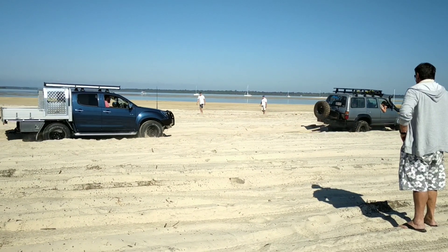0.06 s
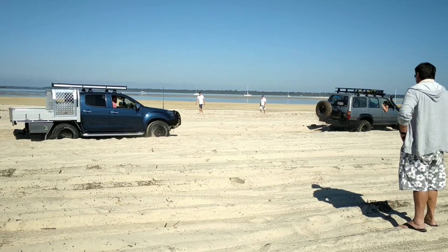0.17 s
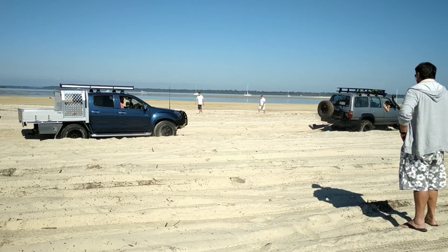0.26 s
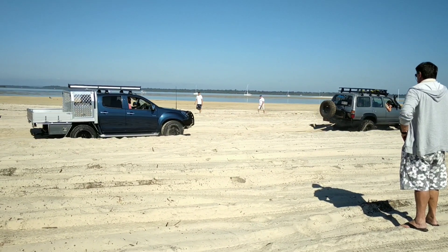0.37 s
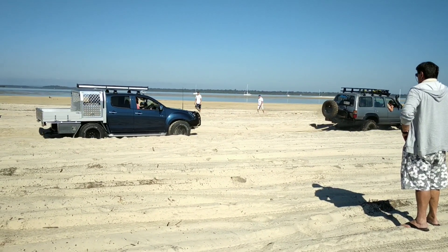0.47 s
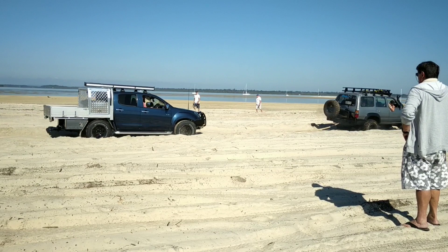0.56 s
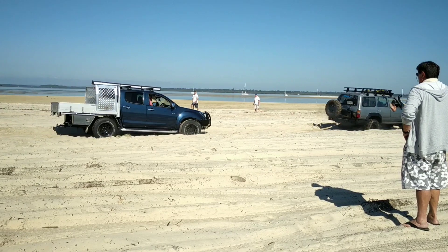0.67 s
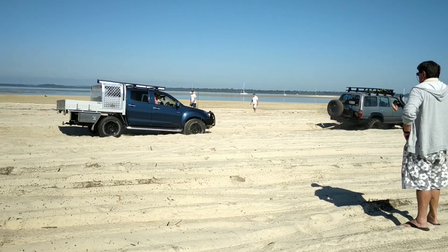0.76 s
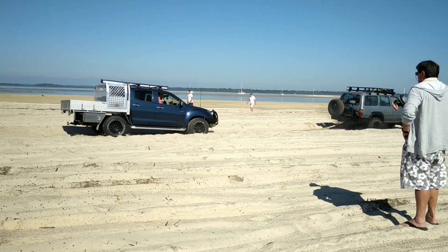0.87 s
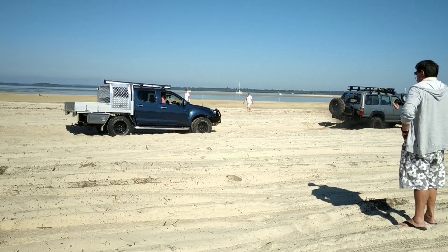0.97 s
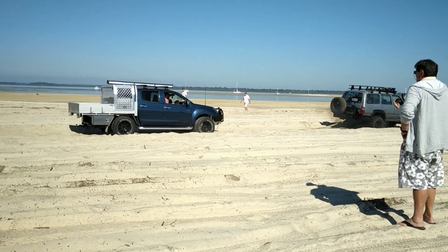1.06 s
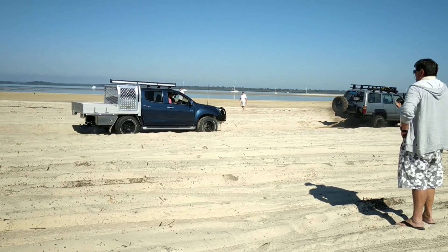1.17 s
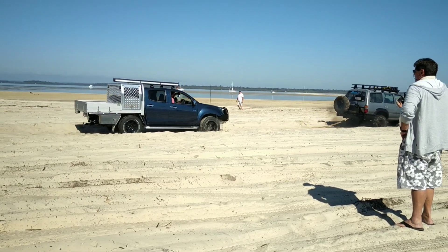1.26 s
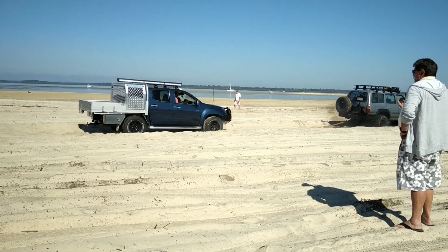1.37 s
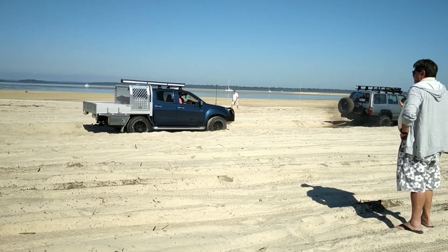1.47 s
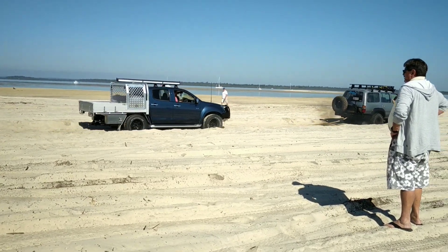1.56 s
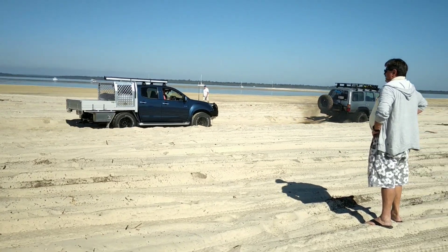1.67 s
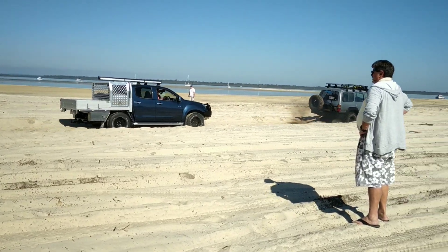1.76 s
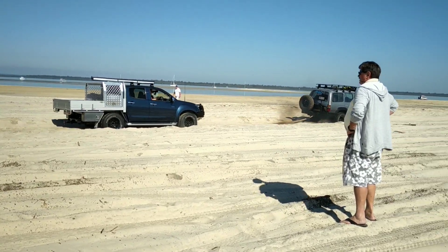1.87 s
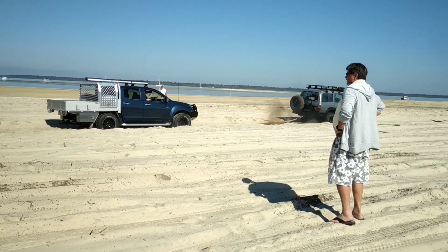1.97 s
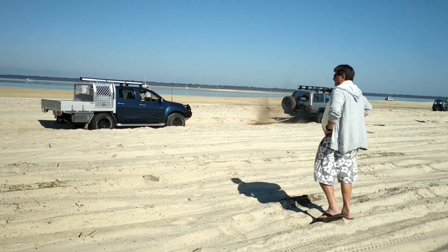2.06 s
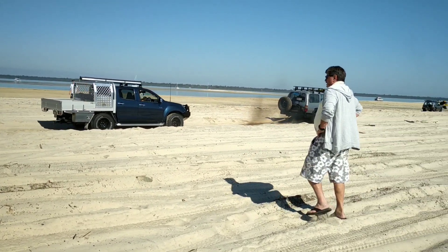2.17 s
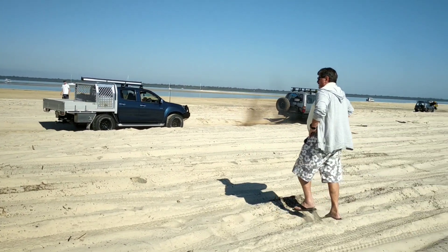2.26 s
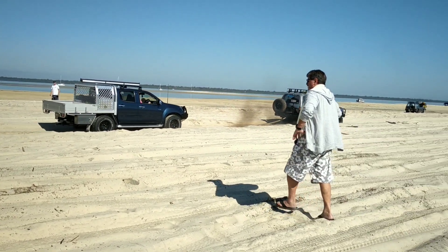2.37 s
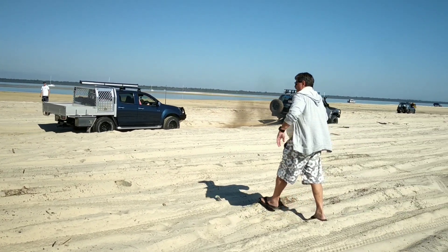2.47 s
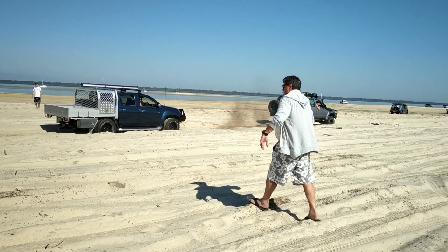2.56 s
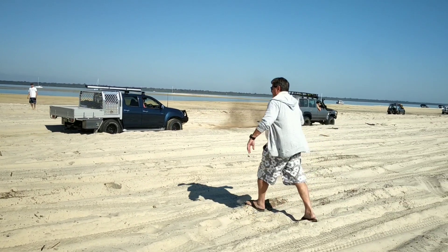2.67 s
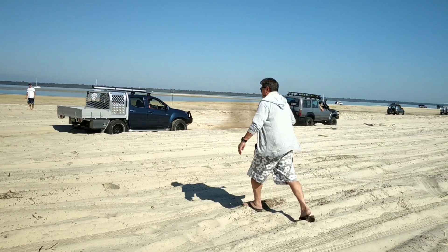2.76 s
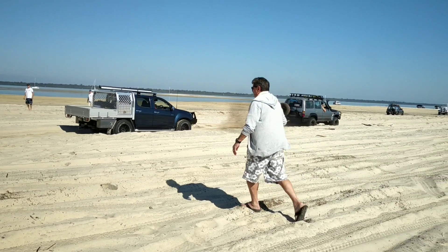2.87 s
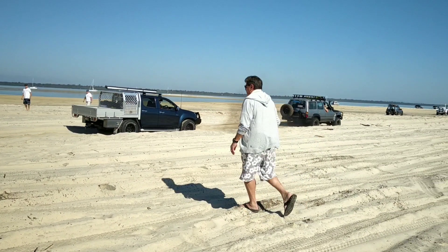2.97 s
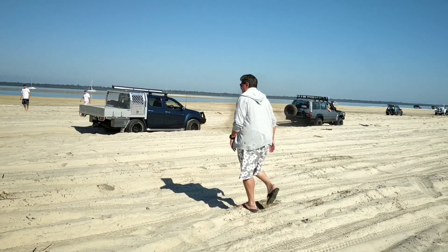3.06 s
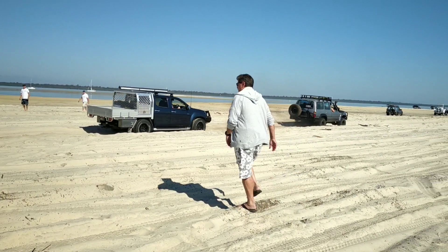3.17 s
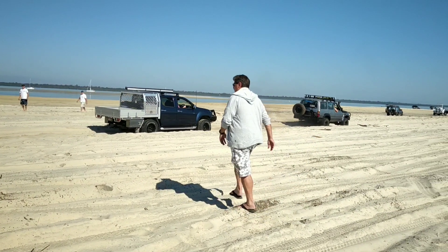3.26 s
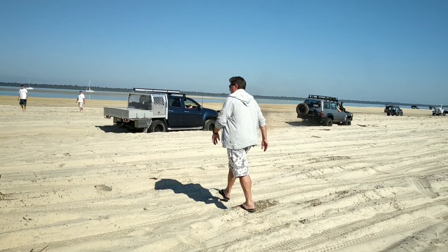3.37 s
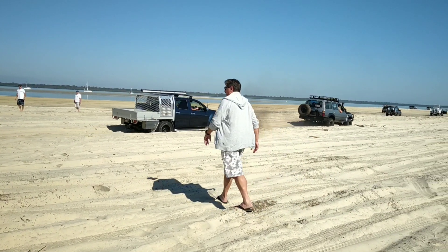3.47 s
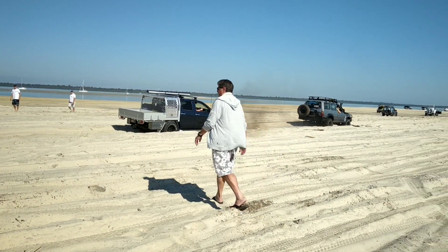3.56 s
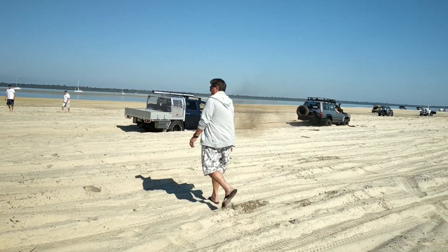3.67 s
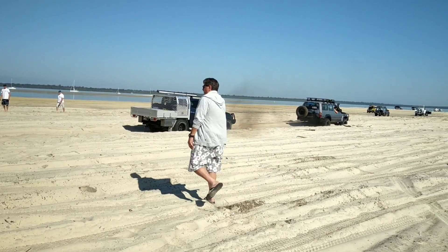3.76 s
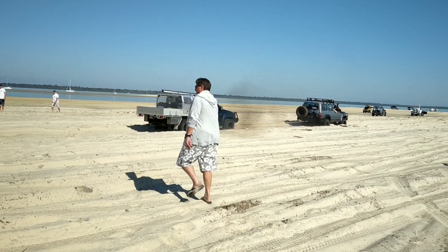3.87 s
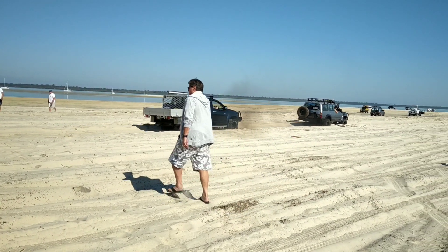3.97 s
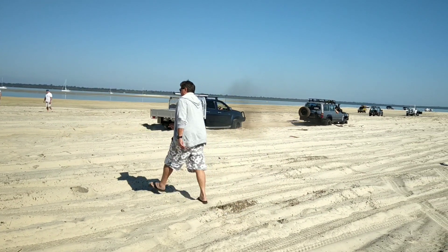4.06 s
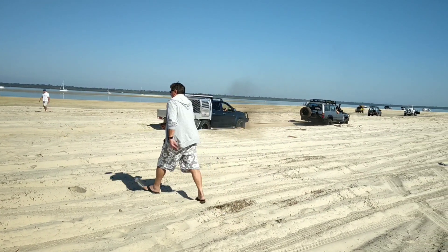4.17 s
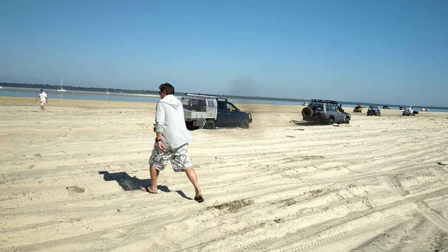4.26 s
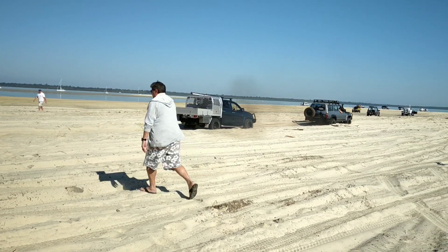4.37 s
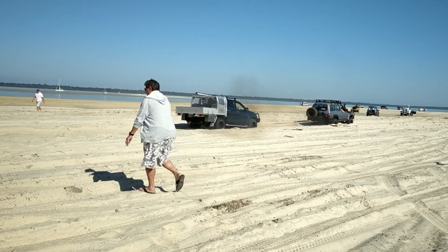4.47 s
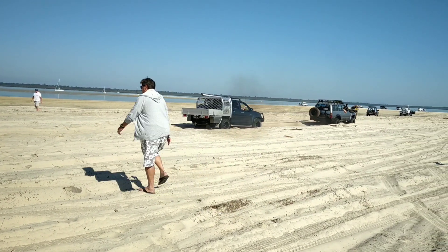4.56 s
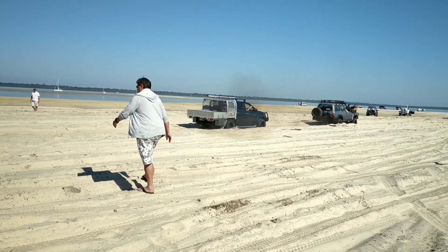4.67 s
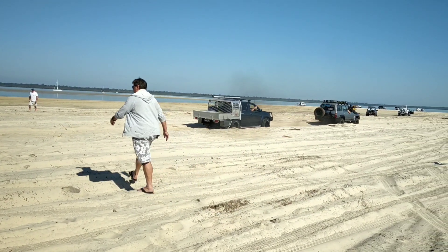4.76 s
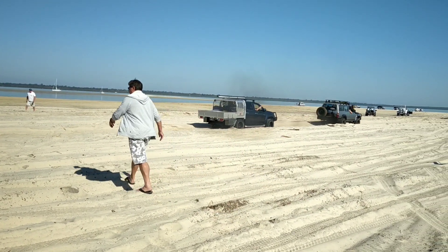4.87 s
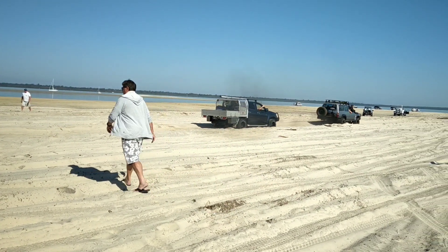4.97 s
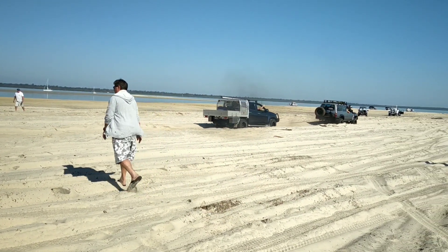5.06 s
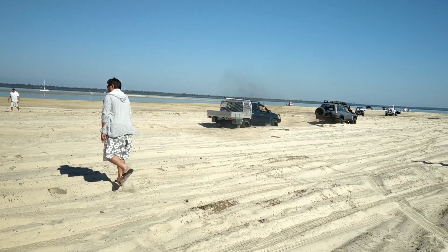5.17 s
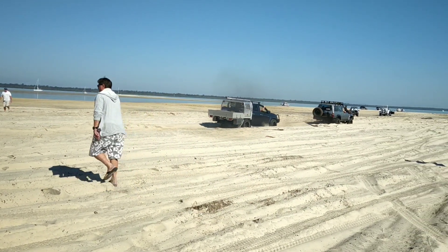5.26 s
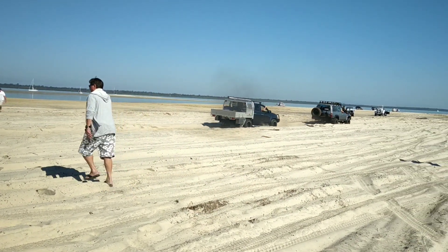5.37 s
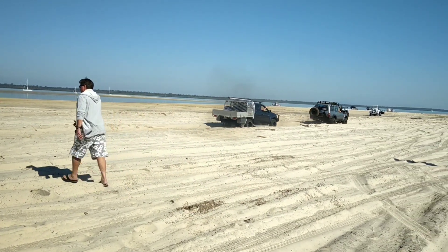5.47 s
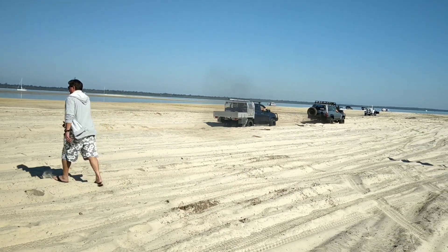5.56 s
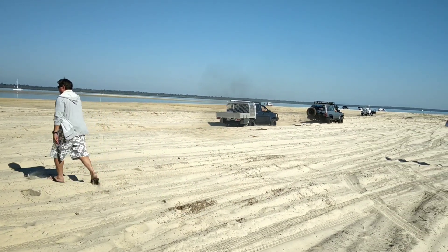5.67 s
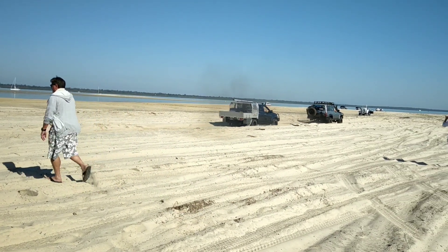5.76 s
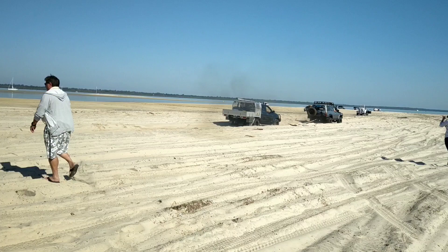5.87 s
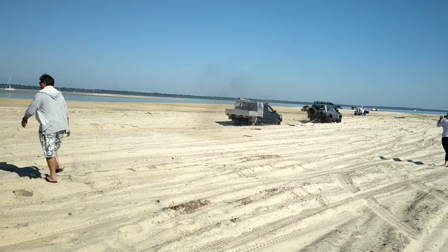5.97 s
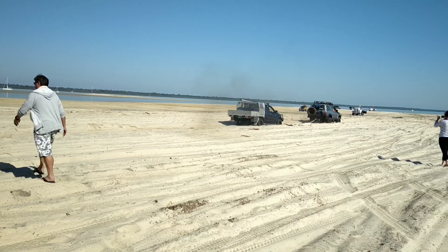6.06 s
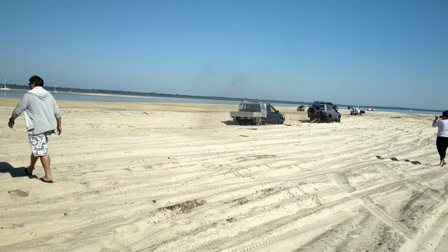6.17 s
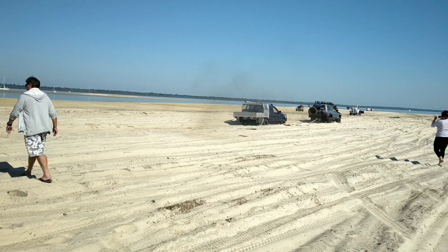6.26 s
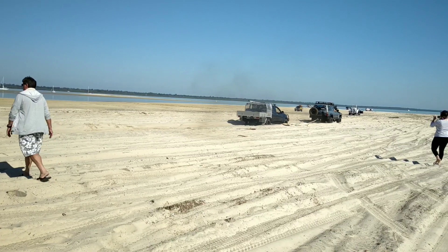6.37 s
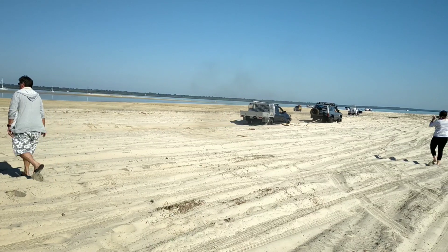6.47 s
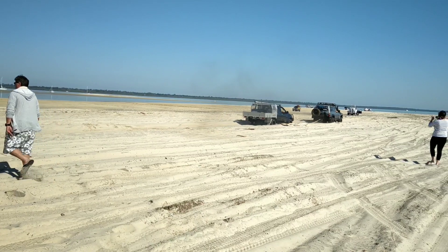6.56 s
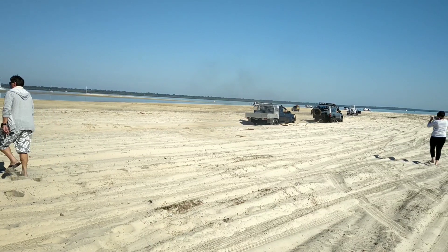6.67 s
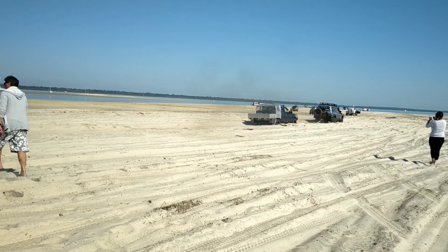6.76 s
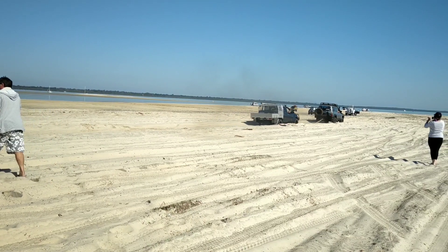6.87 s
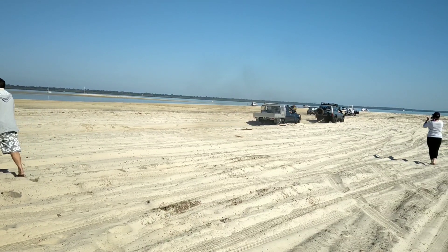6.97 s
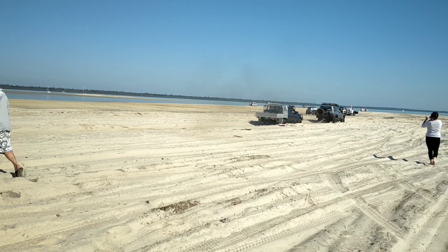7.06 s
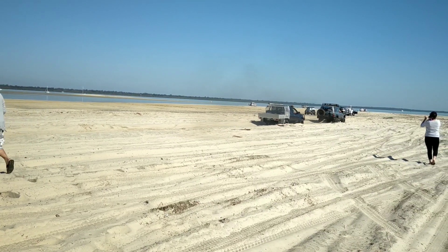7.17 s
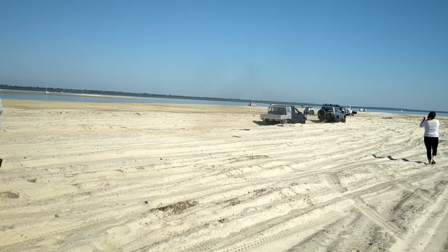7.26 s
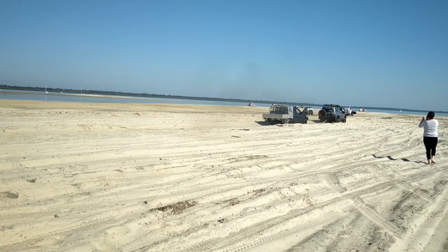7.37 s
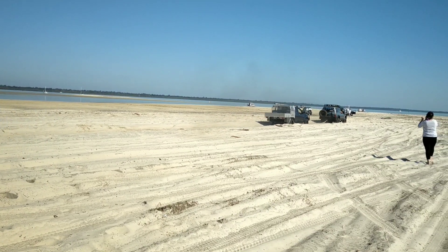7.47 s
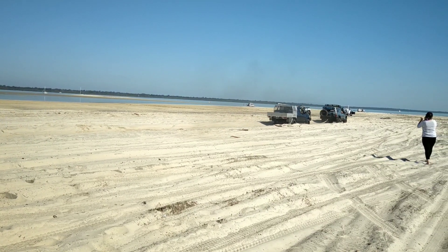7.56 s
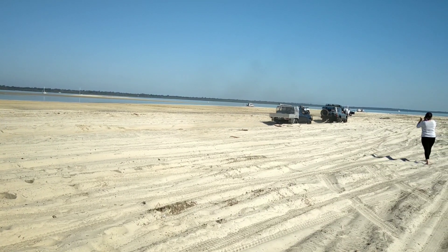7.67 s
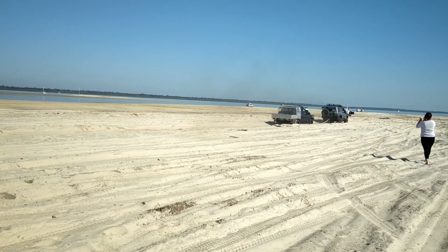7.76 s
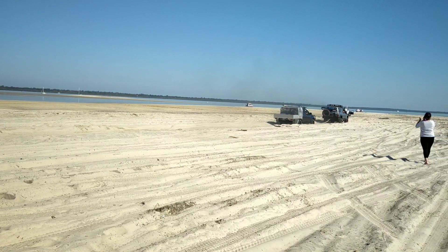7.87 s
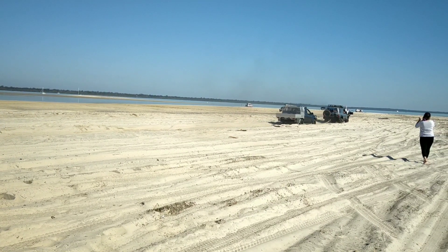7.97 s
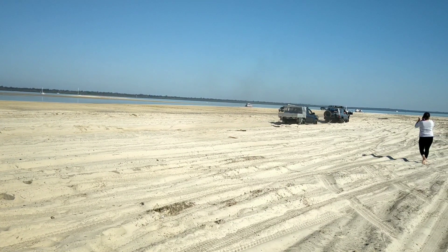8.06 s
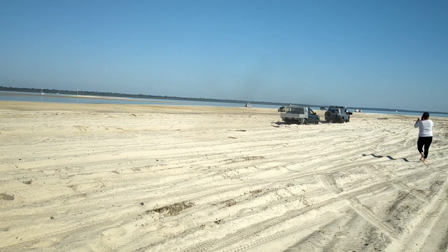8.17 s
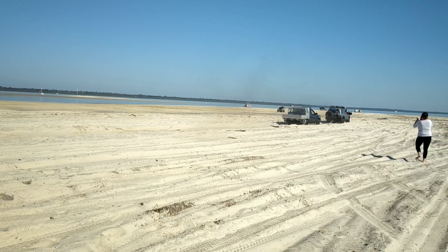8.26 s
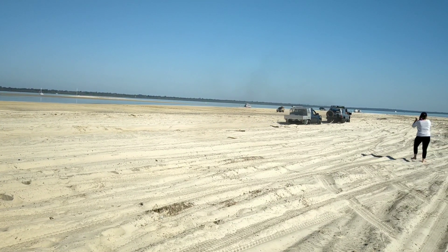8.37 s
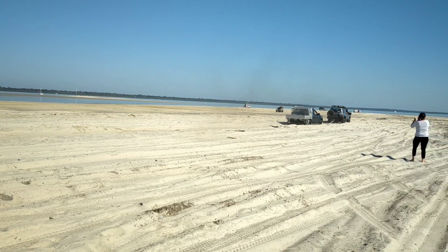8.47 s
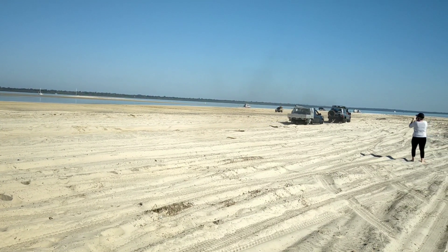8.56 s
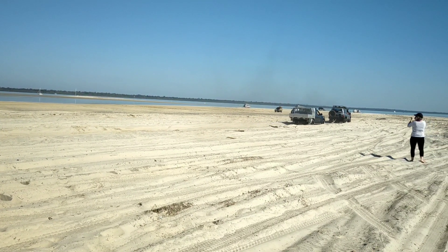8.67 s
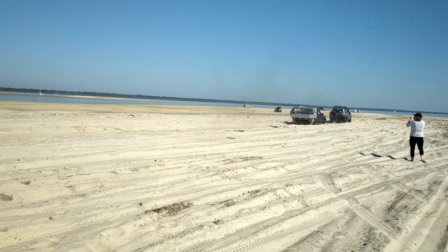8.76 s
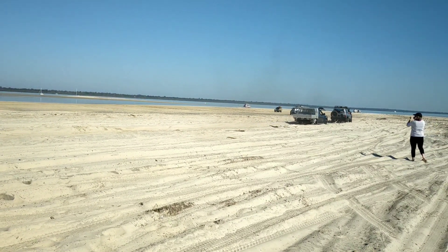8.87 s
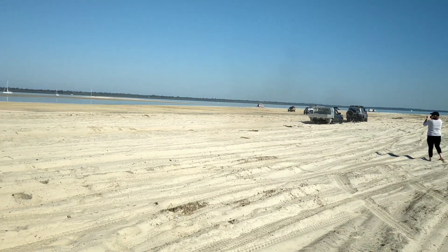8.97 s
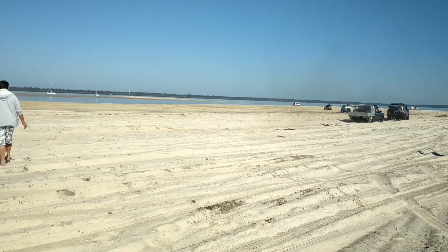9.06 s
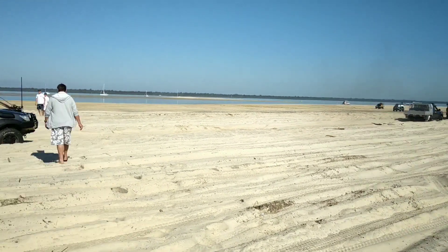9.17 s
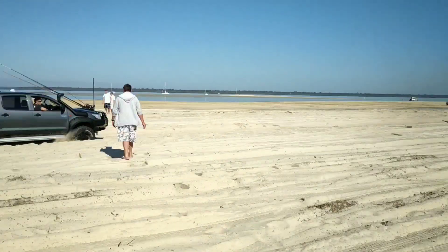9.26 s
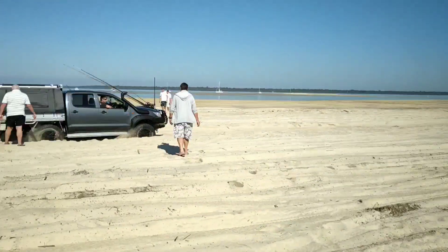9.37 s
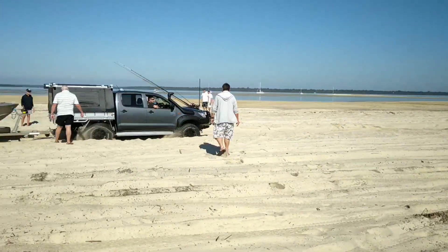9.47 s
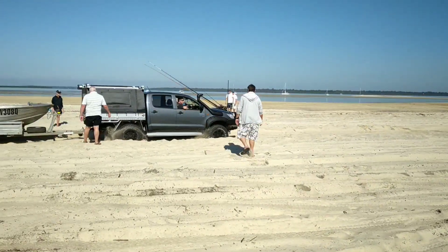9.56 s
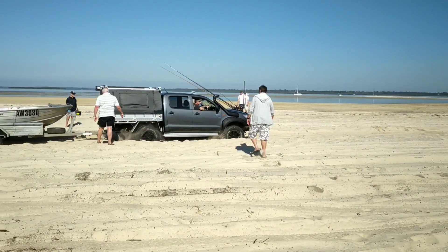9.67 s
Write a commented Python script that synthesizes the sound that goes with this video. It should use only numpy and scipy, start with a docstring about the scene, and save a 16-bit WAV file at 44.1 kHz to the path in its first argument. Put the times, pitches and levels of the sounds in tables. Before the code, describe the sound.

Open beach, no echo, hand-held stereo microphone. At 0 s a nearby six-cylinder truck chugs low under load, with a faint thin whistle at the start and again around 1.7 s. Its pitch climbs continuously into a loud, booming, raspy roar until the throttle lifts at about 2.3 s. Five surges follow: a long one at 2.5-3.4 s, then shorter ones at 3.5, 4.0, 4.8 and 5.3 s, each rising in pitch and dipping after. Dull clunks land near 2.7, 3.5 and 4.1 s; grainy sand hiss runs alongside. From 5.6 s the engine falls lower, pushes again around 6.4 s, then drones away, fading. Idling trucks hum beneath soft shore wash. Air rumble comes near 4 s, ticks and small squeaks from 5.2 s, soft bumps near 5.3 and 5.8 s, stronger ones at 7.9 s, and sharp little knocks at 9.6 s.

```python
"""On a beach, a six-cylinder four-wheel-drive pulls away through soft sand, surges five times and drones off.
Its exhaust sums harmonics of the firing rate, a rasp that nearly repeats and pulsed gas noise; the turbo is a
frequency-modulated whistle, the flung sand grainy filtered noise. Other trucks idle over the wash of the shore.
A hand-held camera with two microphone ports swings round: delays between the ports give direction, and decaying
bursts give its bumps and scuffs. Narrow shimmers and a few clunks come and go."""
import sys
import numpy as np
from scipy import signal
from scipy.fft import rfft, irfft, next_fast_len
from scipy.io import wavfile
from scipy.ndimage import uniform_filter1d

SR = 44100
rng = np.random.default_rng(int(sys.argv[2]) if len(sys.argv) > 2 else 0)


def transcribe(signal):
    """Save signal, clipped to [-1, 1], as a 16-bit WAV file at the path in sys.argv[1]."""
    frames = np.atleast_2d(signal).T
    limited = np.clip(frames, -1, 1)
    pcm = np.round(limited * 32767).astype(np.int16)
    wavfile.write(sys.argv[1], SR, pcm)


N = 427769
T = np.arange(N) / SR  # time in s

# pulling away on full throttle, lifted at the last point: time_s, firing_rate_hz
PULL_AWAY = [(0, 52.13), (.75, 82.44), (1.02, 95.36), (1.45, 130.4), (1.951, 163.4), (2.345, 184.9)]
# surges of throttle: pedal_down_s, pedal_up_s, first_firing_rate_hz, last_firing_rate_hz, throttle_db
SURGES = [(2.523, 3.372, 145.8, 194.3, -2.5), (3.529, 3.857, 175.5, 183.1, -2),
          (4.035, 4.597, 156.4, 186.5, -1.5), (4.806, 5.166, 159.5, 183.7, -1.5),
          (5.341, 5.54, 156.9, 170.6, -3)]
# driving off on part throttle: time_s, firing_rate_hz, throttle_db
CRUISE = [(5.64, 155.6, -14), (5.949, 131.5, -12), (6.2, 128.4, -7), (6.419, 138.7, -1.5),
          (7.05, 134.1, -5), (7.35, 134, -7), (7.751, 124.1, -8.5), (8.7, 127.1, -5.5), (9.7, 119.2, -17)]

RASP_AT_HZ = 180  # firing rate at which the overtone, gas and rasp levels are stated
OVERTONE_FOLLOWS = 0.99  # share of the throttle's dB that overtones and rasp follow


def undb(db):
    """Decibels to amplitude ratio: 20 dB is a factor of ten."""
    return 10 ** (np.asarray(db) / 20)


def unit(x):
    """Normalise the energy: scale to rms 1."""
    return x / np.sqrt(np.mean(x ** 2))


def curves(table):
    """Linear interpolation: each column of a table as a line through time."""
    s, *columns = np.transpose(table)
    return [np.interp(T, s, column) for column in columns]


def response(points, hz):
    """Frequency response: gain of a (Hz, dB) spectrum, interpolated over log frequency."""
    f, db = np.transpose(points)
    return undb(np.interp(np.log(hz + 1e-3), np.log(f), db))


def colour(x, points):
    """Linear filtering: multiply the spectrum of x by a (Hz, dB) response."""
    size = next_fast_len(N, True)
    hz = np.arange(size // 2 + 1) * SR / size
    return irfft(rfft(x, size) * response(points, hz), size)[..., :N]


def walk(rate):
    """Band-limited randomness: smooth chance with about this many turns a second; spread near 1."""
    steps = rng.standard_normal(size=16384)
    line = np.interp(T * rate, np.arange(len(steps)), steps)
    return 1.295 * uniform_filter1d(line, max(int(SR / rate / 2), 1))


def ports(x, lag_ms):
    """Arrival-time difference and diffraction: the far port also hears the sound bend round the camera, later."""
    heard = []
    for side in (-1, 1):  # left, right
        early = T + side * lag_ms / 2e3
        shade_ms = np.maximum(-side * lag_ms, 0)  # above zero only at the far port
        detour = early - .68 * shade_ms / 1e3
        share = np.clip(shade_ms, 0, .45)
        heard.append((1 - share) * np.interp(early, T, x) + share * np.interp(detour, T, x))
    return np.array(heard)


def wide_noise(points, lag_ms, apart_hz, most):
    """Partial coherence: directional noise, a growing share of it unrelated at the ports above apart_hz."""
    size = next_fast_len(N, True)
    hz = np.arange(size // 2 + 1) * SR / size
    share = np.clip(most, 0, 1) * hz ** 2 / (hz ** 2 + apart_hz ** 2)
    noise = rfft(rng.standard_normal((3, size))) * response(points, hz)
    direct = irfft(noise[0] * np.sqrt(1 - share), size)[:N]
    diffuse = irfft(noise[1:] * np.sqrt(share), size)[:, :N]
    return unit(ports(direct, lag_ms) + diffuse)


def burst(start, decay, rise):
    """Damped impact: a quick rise and an exponential fall."""
    age = np.maximum(T - start, 0)
    return (1 - np.exp(-age / rise)) * np.exp(-np.minimum(age / decay, 50))


def held(start, end, rise, fall):
    """First-order response: exponential attack, hold and release."""
    return (1 - np.exp(-np.maximum(T - start, 0) / rise)) * np.exp(-np.maximum(T - end, 0) / fall)


def swell(middle, half):
    """Gaussian envelope: a smooth rise and fall."""
    return np.exp(-((T - middle) / half) ** 2)


def revs():
    """Torque against load: firing rate climbs, then creeps in each surge, and sinks between them."""
    climb_hz_per_s, creep_hz_per_s = 80, 24  # fast at first, then against the drag of the sand
    points = list(PULL_AWAY)
    for down, up, first_hz, last_hz, _ in SURGES:
        s = np.arange(down, up, 1 / 100)
        climb_hz = first_hz + climb_hz_per_s * (s - down)
        creep_hz = last_hz - creep_hz_per_s * (up - s)
        points += list(zip(s, np.minimum(climb_hz, creep_hz)))
    points += [(s, hz) for s, hz, _ in CRUISE]
    return curves(points)[0]


def throttle():
    """Envelope control: throttle in dB for one long pull, the surges, then a light foot."""
    pedal_rise_s, pedal_fall_s = 0.021, 0.047
    overrun_db = -22  # what is left with the pedal up

    def pedal(down, up):
        return held(down, up, pedal_rise_s, pedal_fall_s)

    pull = pedal(-1, PULL_AWAY[-1][0])
    surges = sum(undb(db) * pedal(down, up) for down, up, _, _, db in SURGES)
    cruise = undb(curves(CRUISE)[1]) * pedal(CRUISE[0][0], T[-1])
    return 20 * np.log10(pull + surges + cruise + undb(overrun_db))


def rasp(turn):
    """Near-periodicity: grit that almost repeats each round of six cylinders makes a comb of fine lines."""
    # gritty rasp under load: frequency_hz, density_db (dB per Hz)
    rasp_spectrum = [(200, -29.5), (370, -5), (450, -8), (560, 1.5), (690, 1), (780, -2), (900, -6),
                     (1080, -18.5), (1400, -2.5), (1700, -16.5), (2300, -26), (4000, -38)]
    size, count = 512, 400  # points in a round, rounds
    likeness = .87  # of one round to the next
    fresh = rng.standard_normal((count, size))
    rounds = signal.lfilter([1], [1, -likeness], fresh, axis=0).ravel()
    grit = np.interp(turn / (12 * np.pi) * size, np.arange(len(rounds)), rounds)  # six firings a round
    return unit(colour(grit * (1 + 0.21 * np.cos(turn)), rasp_spectrum))


def exhaust(hz, throttle_db, tailpipe_db, lag_ms):
    """Harmonic series in a pipe: firings boom, uneven cylinders add overtones, and gas rushes in pulses."""
    # full-throttle answer to the revs: firing_rate_hz, boom_db, bark_db (at twice the rate), undertone_db
    by_revs = [(55, -45, -24.5, -55), (68.7, -26, -30, -47), (79, -23.5, -27.5, -42), (95, -21, -27, -44),
               (116, -22.5, -40.5, -60), (143, -19.5, -39, -41), (153.7, -14.5, -29.5, -38.5),
               (158.4, -14, -28.5, -35), (186, -9.5, -38.5, -42), (202, -11.5, -44, -51.5)]
    # overtones; unequal cylinders fill in the thirds and sixths:
    # firing_rate_multiple, level_db (relative), extra_lugging_db
    orders = [(2/3, 3, -8), (7/6, -7, -3), (4/3, 4.5, 1), (3/2, 1, -3), (5/3, 5.5, -2), (11/6, -4, 0),
              (13/6, -3, -3), (7/3, 1, 8), (5/2, -3, 7), (8/3, 10, -1), (17/6, -4, 0), (3, 11, 2),
              (19/6, 1, -4), (10/3, 1.5, 2), (7/2, 4.5, 0), (11/3, 11.5, 1), (23/6, 1, -4), (4, 9, -1),
              (25/6, 2, -3), (13/3, 6, 0), (14/3, 5, -3), (5, 6, 8), (16/3, -2, 0), (17/3, -4, 10),
              (6, -3, 11), (20/3, -6, 8), (7, -6, 6)]
    # exhaust pipe response: frequency_hz, gain_db
    pipe = [(70, -3), (110, -9), (140, -2), (170, 3), (200, -1.5), (230, -7.5), (285, 1), (320, -4),
            (360, -12.5), (420, -13.5), (480, -20), (560, -16), (610, -20), (675, -13), (745, -19.5),
            (820, -22), (1100, -24.5), (1400, -12), (2200, -32)]
    # rushing exhaust gas: frequency_hz, density_db (dB per Hz)
    gas_spectrum = [(25, -33.5), (45, -10), (70, -2), (150, 4.5), (280, 2), (420, -5.5), (680, -4.5),
                    (1050, -15.5), (1400, -14), (2200, -29.5), (3200, -27.5), (6000, -30.5), (15000, -57.5)]
    overtone_base_db, overtone_db_per_octave = -28.5, 13
    gas_base_db, gas_db_per_octave, gas_follows = -33.2, 8.5, .13  # follows: share of the throttle's dB
    rasp_base_db, rasp_db_per_octave = -35.7, 15
    lug_hz, lug_ends_hz = 91, 135  # full lugging below the first, none above the second
    chug_depth, pipe_round_trip_s = .75, .0065

    rates, *levels = np.transpose(by_revs)
    boom_db, bark_db, undertone_db = (np.interp(hz, rates, db) + throttle_db for db in levels)
    octaves = np.log2(hz / RASP_AT_HZ)
    # below lug_hz the lugging engine chugs no more softly
    growth_db = overtone_db_per_octave * np.log2(np.maximum(hz, lug_hz) / RASP_AT_HZ)
    overtone_db = overtone_base_db + growth_db + OVERTONE_FOLLOWS * throttle_db + tailpipe_db
    gas_db = gas_base_db + gas_db_per_octave * octaves + gas_follows * throttle_db + tailpipe_db
    rasp_db = rasp_base_db + rasp_db_per_octave * octaves + OVERTONE_FOLLOWS * throttle_db

    turn = 2 * np.pi * np.cumsum(hz * (1 + .0015 * walk(30))) / SR  # firing phase, slightly unsteady
    # the bark lags by the pipe's round trip: sharp dips at low revs, sharp crests at high revs
    pipe_lag = 2 * np.pi * hz * pipe_round_trip_s
    boom = np.cos(turn) * undb(boom_db + 0.5 * walk(25))
    bark = np.cos(2 * turn - pipe_lag) * undb(bark_db + 0.89 * walk(12))
    # the undertone lies a fixed 104 Hz from the firing rate
    undertone = np.cos(turn - 2 * np.pi * 104 * T) * undb(undertone_db)

    lugging = np.interp(hz, [lug_hz, lug_ends_hz], [1, 0])
    overtones = 0
    for order, db, lug_db in orders:
        # whole multiples line up into one pulse a firing; the others fall anywhere
        offset = rng.uniform(0, 2 * np.pi) if order % 1 else (1 - order) * pipe_lag
        flutter = undb(db + lug_db * lugging + 2.5 * walk(9))
        phase = order * turn + offset + .045 * order * walk(12)
        overtones = overtones + flutter * response(pipe, order * hz) * np.cos(phase)

    tone = np.sqrt(2) * (boom + bark + undertone) + .5 * overtones * undb(overtone_db)
    tone = tone + rasp(turn) * undb(rasp_db)
    # the gas pulses with each firing and each turn of the crank, in separate chugs while the engine lugs
    puffs = unit(1 + (.11 - chug_depth * lugging) * np.cos(turn) + 0.15 * np.cos(turn / 3))
    rush = wide_noise(gas_spectrum, lag_ms, apart_hz=900, most=.4)
    return ports(tone, lag_ms) + rush * puffs * undb(gas_db + .5 * walk(13))


def sand(lag_ms):
    """Granular noise: spinning tyres fling a grainy hiss of sand, with a faint hiss at the top of the range."""
    # level of the sandy hiss: time_s, level_db
    spray = [(0, -45), (1, -45.5), (1.3, -42), (3.1, -41), (4.4, -41.5), (5.3, -46.5), (5.9, -44.5),
             (7.2, -51), (8.1, -47.5), (9.7, -51.5)]
    # colour of the sandy hiss: frequency_hz, density_db (dB per Hz)
    sand_spectrum = [(600, -0.5), (1200, 0), (1800, 6), (2250, 3.5), (2800, 3), (3500, -2.5), (3950, -17),
                     (4900, -4.5), (5700, -4.5), (5970, -7), (6700, -1), (7400, -10.5), (7900, -11),
                     (10500, -22), (14500, -25.5)]
    # level of a faint hiss at the top of the range: middle_s, half_length_s, level_db
    top_hiss_levels = [(0.423, 0.28, -64), (1.245, 0.18, -56), (8.85, 0.7, -63)]
    top_hiss_floor_db = -84
    top_hiss_spectrum = [(8000, -33.5), (12000, -16.0), (14200, 1.0), (16000, -8.0)]  # Hz, dB per Hz
    spray_db, = curves(spray)
    grains = unit(undb(1.0 * walk(1500) + 1.05 * walk(70)))
    hiss = wide_noise(sand_spectrum, lag_ms, apart_hz=1800, most=.65)
    top_level = undb(top_hiss_floor_db) + sum(undb(db) * swell(s, half) for s, half, db in top_hiss_levels)
    top_hiss = wide_noise(top_hiss_spectrum, lag_ms, apart_hz=1300, most=.7)
    return hiss * grains * undb(spray_db) + top_hiss * top_level * undb(2.5 * walk(12))


def turbo():
    """Random frequency modulation: a thin breathy whistle climbs as the boost builds."""
    # turbo spooling up: time_s, whistle_hz, level_db
    spool = [(0, 13600, -74), (.17, 14800, -60), (.3, 16000, -75), (.45, 16120, -89), (1.42, 10200, -91),
             (1.6, 11640, -71), (1.7, 13500, -66), (1.79, 15200, -63), (1.84, 15370, -104)]
    hz, db = curves(spool)
    breath_hz = 330 * np.array([walk(1400), walk(1400)])  # unrelated at the two ports
    return np.sqrt(2) * undb(db) * np.sin(2 * np.pi * np.cumsum(hz + breath_hz, axis=1) / SR)


def idlers(idle_db, lag_ms):
    """Amplitude modulation: idling trucks hum in wavering lines; the shore's wash carries a soft diesel clatter."""
    # hum of the idling trucks: frequency_hz, level_db (relative)
    hum_lines = [(75.3, -47), (166.9, -46.5), (193.2, -53), (220.7, -43.5), (248.3, -54), (276, -51),
                 (303.5, -55), (374, -56), (515, -59.5), (827, -58.5), (986, -71), (1083, -68)]
    # the shore: frequency_hz, density_db (dB per Hz)
    shore_spectrum = [(25, -32), (45, -7), (75, -3), (150, 3.5), (270, -2), (450, -24), (530, -13),
                      (600, -12.5), (800, -11.5), (1100, -24.5), (1800, -21), (3000, -29.5), (4200, -40.5),
                      (6000, -25), (10000, -45), (14500, -40.5)]
    wander, idle_hz = .0025, 26.5  # relative pitch wander of the hum, clatter rate
    hum = 0
    for hz, db in hum_lines:
        level = undb(db + 1.8 * walk(3))
        wavering_hz = hz * (1 + wander * walk(3))
        hum = hum + level * np.sin(2 * np.pi * np.cumsum(wavering_hz) / SR)
    clatter = unit(1 + 0.071 * np.cos(2 * np.pi * idle_hz * T + walk(15.0)))
    wash = wide_noise(shore_spectrum, lag_ms, apart_hz=600, most=1.0)
    wash = wash * clatter * undb(-41.5 + 1.5 * walk(9.1))
    return (0.81 * ports(hum, lag_ms) + wash) * undb(idle_db)


def handling(lag_ms):
    """Modal resonance and turbulence: the hand bumps and rubs the shell, and air rumbles on the ports."""
    # air on the ports: frequency_hz, density_db (dB per Hz)
    rumble_spectrum = [(20, -28), (35, -21), (60, -3), (110, -6), (200, -17), (400, -27.5), (2000, -65.5)]
    # swings of the camera: start_s, end_s, air_rumble_db, grip_rustle_db (relative)
    swings = [(3.902, 4.349, -34.5, -82), (4.998, 5.399, -46, -55), (7.494, 7.994, -46, -48),
              (9.275, 9.6, -41, -44)]
    # dull bumps of the hand: start_s, level_db (relative), decay_s, extra_hard_knock_db
    bumps = [(5.261, -28, 0.1, -3.5), (5.83, -26, 0.08, -6.5), (7.865, -30, 0.036, -5),
             (7.907, -16.5, 0.019, -20), (7.927, -20, 0.028, -11), (7.99, -26, 0.013, -10),
             (9.58, -39, 0.0061, -5), (9.628, -25, 0.0044, 4.5), (9.667, -26, 0.005, 6.5)]
    # what the bumps ring with: frequency_hz, width_hz, level_db (relative)
    bump_modes = [(102.2, 56, -8.5), (230.5, 30, -5.5), (289.6, 27, 0), (329.6, 27, -6)]
    # the shell when knocked or rubbed: frequency_hz, density_db (dB per Hz)
    shell_spectrum = [(200, -25), (380, -2.5), (450, -7), (700, -1), (830, -4.5), (1000, -16), (1700, -19),
                      (4000, -34), (8000, -47.5)]
    swing_rise_s, swing_fall_s = 0.051, 0.095

    push = sum(undb(db) * burst(s, decay, rise=0.0037) for s, db, decay, _ in bumps)
    knock = sum(undb(db + hard_db) * burst(s, decay, rise=0.002) for s, db, decay, hard_db in bumps)
    ring = 0
    for hz, width, db in bump_modes:
        unsteady_hz = hz + width * walk(1.5 * width) / 2
        ring = ring + undb(db) * np.sin(2 * np.pi * np.cumsum(unsteady_hz) / SR)

    rumble, rustle = undb(-52), undb(-79.5)  # air and grip between the swings
    for start, end, rumble_db, rustle_db in swings:
        swing = held(start, end, swing_rise_s, swing_fall_s)
        rumble = rumble + undb(rumble_db) * swing
        rustle = rustle + undb(rustle_db) * swing
    slips = unit(undb(2.8 * walk(70)))
    shell = wide_noise(shell_spectrum, lag_ms, apart_hz=1500, most=0.89) * (0.48 * knock + slips * rustle)
    air = wide_noise(rumble_spectrum, lag_ms, apart_hz=30, most=0.28) * rumble
    return 0.52 * unit(ring) * push + shell + air


def shimmer():
    """Narrow-band noise: bands swell and waver; the lowest sound as an unsteady whine, alike at both ports."""
    # ringing swells of whine and hiss: middle_s, half_length_s, centre_hz, width_hz, level_db, flicker_db
    shimmers = [(.25, .05, 1380, 200, -51, 1.5), (.39, .06, 525, 20, -48, 1),
                (.51, .035, 1400, 200, -47, 1.5), (1.25, .45, 860, 150, -49, 1.5),
                (2.87, .06, 350, 35, -32, 1), (4.39, .08, 378, 70, -33.5, .5),
                (5.27, .045, 370, 110, -41, 1), (5.75, .35, 1860, 200, -54, 2),
                (8.27, .18, 535, 45, -51, 1), (8.2, .45, 1820, 100, -56, 3), (8.3, .45, 1975, 60, -56.5, 3),
                (8.1, .8, 6230, 380, -61, 1.6), (8.3, .8, 6820, 380, -62, 1.6),
                (9.1, .7, 5630, 280, -59.5, 4), (9.2, .6, 7900, 1200, -65, 1.6)]
    size = next_fast_len(N, True)
    hz = np.arange(size // 2 + 1) * SR / size
    mid, side = rfft(rng.standard_normal((2, size)))
    side = side * np.minimum(hz / 1500, 1)  # the ports agree more and more toward low frequencies
    noise = np.array([mid + side, mid - side])
    flicker = walk(28)  # shared by all bands
    total = 0
    for s, half, centre, width, db, flicker_db in shimmers:
        bell = np.exp(-(2 * (hz - centre) / width) ** 2)
        band = unit(irfft(noise * bell, size)[:, :N])
        total = total + band * swell(s, half) * undb(db + flicker_db * flicker)
    return total


def clunks(lag_ms):
    """Impact noise: short dull knocks from the truck as it takes up the load."""
    # blows: start_s, level_db
    blow_list = [(2.694, -26), (3.534, -32), (3.598, -35), (4.062, -32)]
    # colour of a blow: frequency_hz, density_db (dB per Hz)
    clunk_spectrum = [(80, -12), (300, -2), (450, 4), (680, 12), (1100, -19), (1500, -22), (3000, -34),
                      (8000, -43)]
    blows = sum(undb(db) * burst(s, decay=0.012, rise=0.00036) for s, db in blow_list)
    return blows * ports(unit(colour(rng.standard_normal(N), clunk_spectrum)), lag_ms)


def scuffs(lag_ms):
    """Friction noise: ticks and scuffs as noise bursts, with short unsteady squeaks."""
    # ticks, scuffs and squeaks: start_s, scuff_db (relative), decay_s, squeak_hz, squeak_db
    scuff_list = [(5.218, -44.5, 0.008, 1795, -38), (5.557, -55, 0.017, 2580, -41),
                  (5.675, -53, 0.063, 1502, -44.5), (5.762, -54, .016, 2470, -46),
                  (5.955, -58, .025, 2540, -47.5), (5.963, -47, 0.048, 1680, -42),
                  (5.995, -70, 0.052, 1590, -40.5), (6.07, -61, 0.08, 1660, -50),
                  (6.989, -49.5, 0.0092, 1886, -55), (8.03, -54, 0.033, 2087, -52),
                  (8.315, -47.5, 0.025, 1820, -44), (8.55, -67, 0.019, 2454, -50)]
    # colour of the rubbing: frequency_hz, density_db (dB per Hz)
    scuff_spectrum = [(700, 2), (1600, 7), (2550, -3), (3900, -9.5), (4900, 4.5), (5800, -6), (6600, 8.5),
                      (8500, -34), (11000, -20), (15000, -17)]
    rub, squeak = 0, 0
    waver = 2 * np.pi * np.cumsum(58 * walk(400)) / SR
    for s, db, decay, hz, squeak_db in scuff_list:
        shape = burst(s, decay, rise=0.0014)
        rub = rub + undb(db) * shape
        squeak = squeak + undb(squeak_db) * shape * np.sin(2 * np.pi * hz * T + waver)
    scrape = wide_noise(scuff_spectrum, lag_ms, apart_hz=994, most=1.0)
    return 2.4 * rub * scrape + np.sqrt(2) * squeak


def scene():
    """Inverse-distance law: the exhaust fades as the truck recedes; the other layers carry their own levels."""
    # the camera turns past the trucks: time_s, left_port_delay_ms
    bearing = [(0, -0.13), (1.7, -0.18), (2.6, -0.14), (4.3, -0.16), (5.05, -0.19), (5.4, 0.32),
               (7.7, 0.32), (9.0, 0.27), (9.55, -.02)]
    near_m, speed_m_s, leaves_s = 11.3, 9.3, 2.45  # nearest distance, speed, when it starts to recede
    tailpipe_db = 2  # overtones and gas gain up to this as the tailpipe comes to point back at the camera
    lag_ms, = curves(bearing)
    away_m = speed_m_s * np.maximum(T - leaves_s, 0)
    distance_m = np.hypot(near_m, away_m)
    engine = exhaust(revs(), throttle(), tailpipe_db * away_m / distance_m, lag_ms)
    truck = engine * near_m / distance_m + sand(lag_ms) + turbo() + clunks(lag_ms)
    surroundings = idlers(2, lag_ms) + shimmer()  # idlers raised by 2 dB
    return truck + surroundings + handling(lag_ms) + scuffs(lag_ms)


def record(dry):
    """Transducer response: each port colours the sound its own way; a steep low-pass cuts the top."""
    # the two ports differ in colour: frequency_hz, left_minus_right_db
    port_difference = [(200, 0), (700, -.5), (1300, -1), (1900, -3), (2600, -1.5), (3300, 0), (4100, 3.5),
                       (5300, 1), (6600, -4.5), (8100, -7), (15000, -4)]
    top_hz = 15700
    heard = []
    for x, side in zip(dry, (1, -1)):
        heard.append(colour(x, [(hz, side * db / 2) for hz, db in port_difference]))
    low_pass = signal.ellip(10, .2, 80, top_hz, fs=SR, output="sos")
    return signal.sosfilt(low_pass, np.array(heard))


dry = scene()
out = record(dry)
transcribe(out)
```